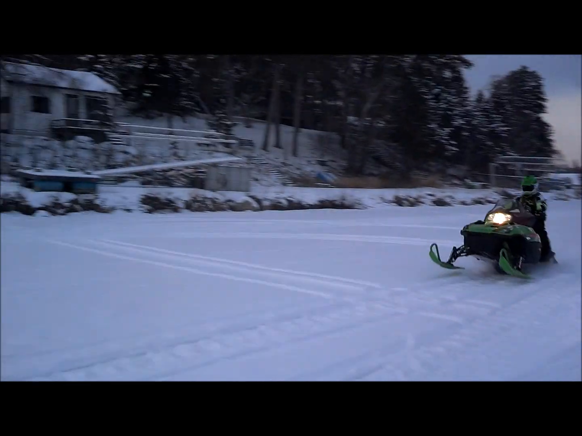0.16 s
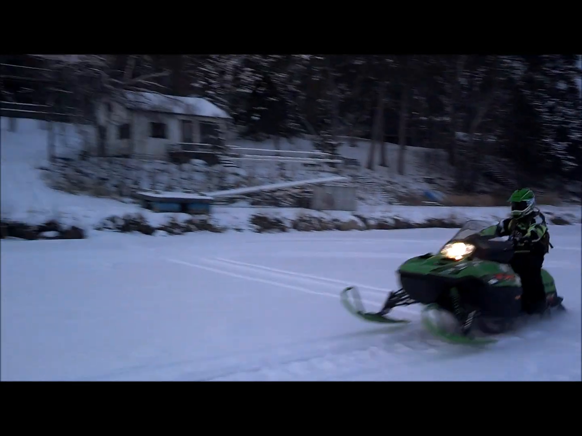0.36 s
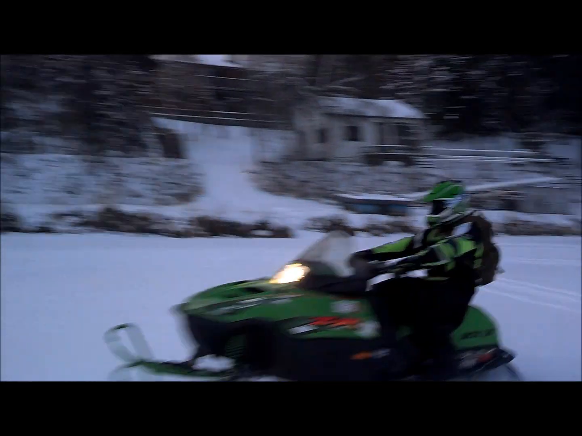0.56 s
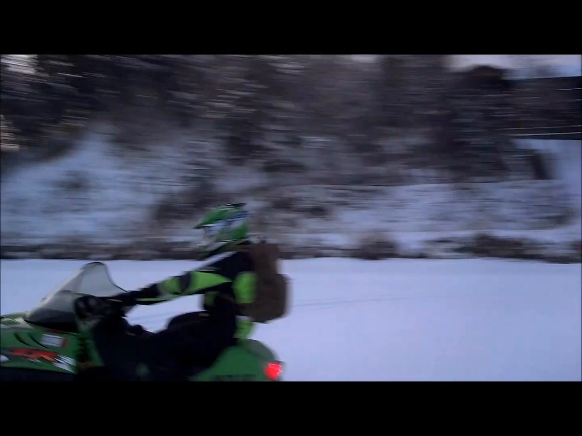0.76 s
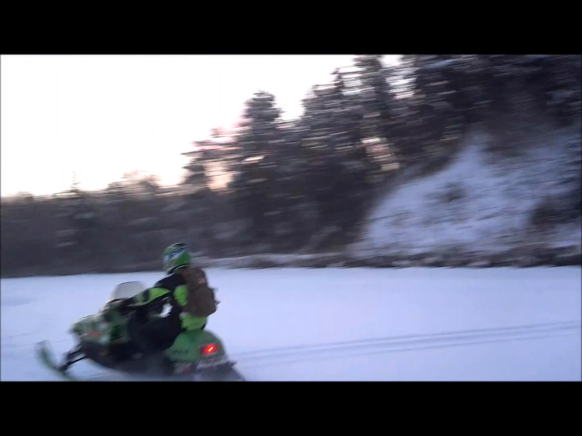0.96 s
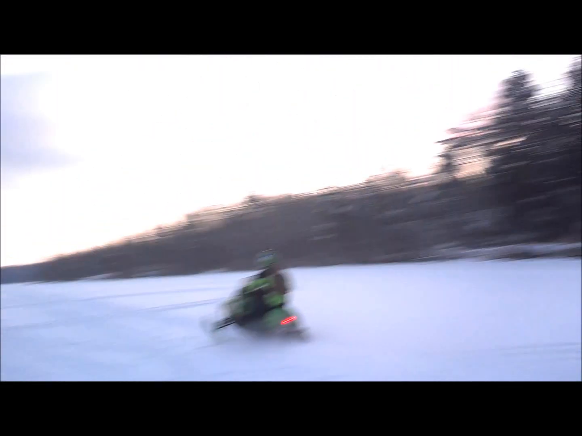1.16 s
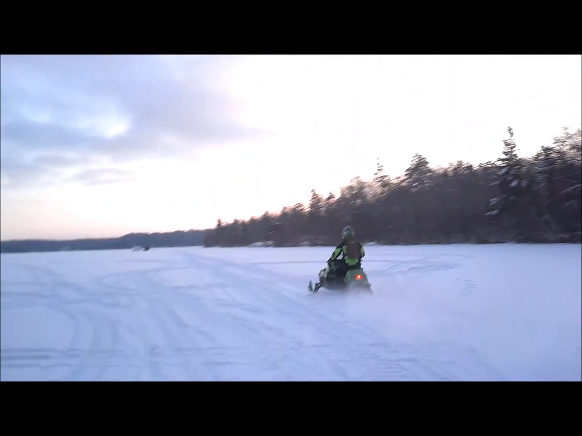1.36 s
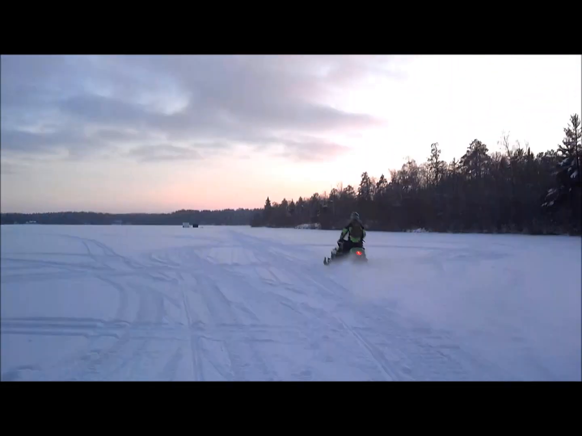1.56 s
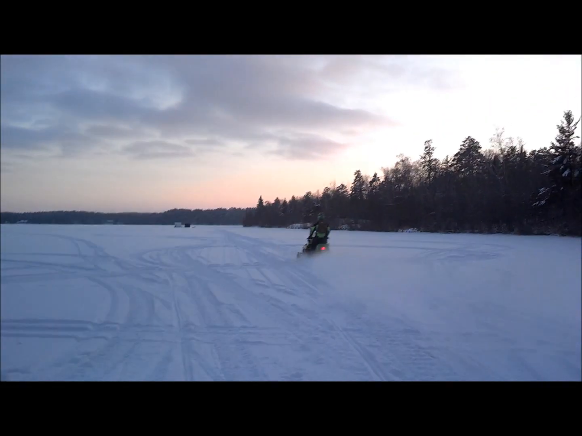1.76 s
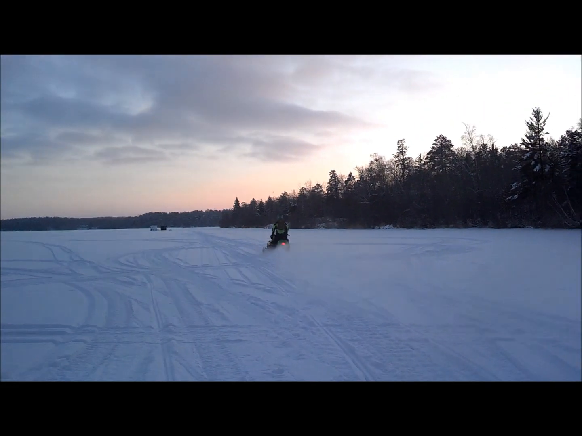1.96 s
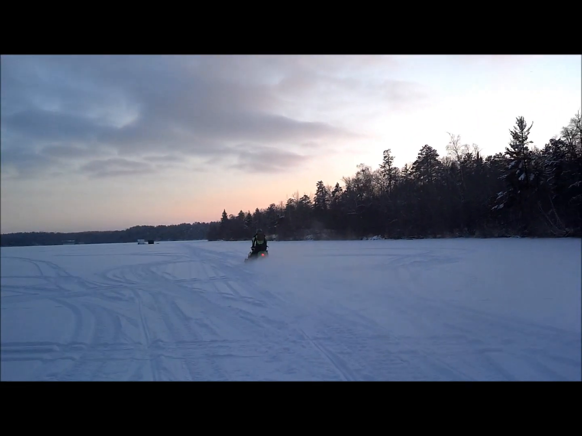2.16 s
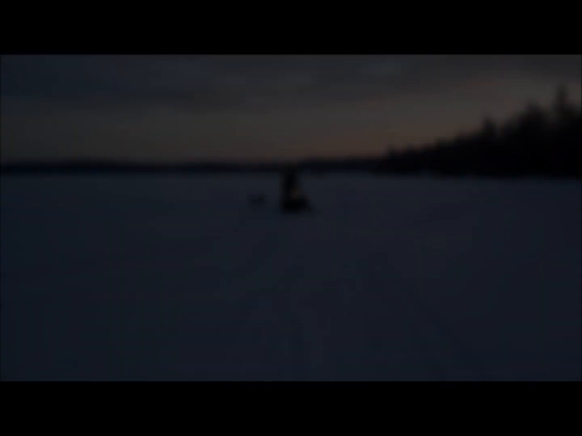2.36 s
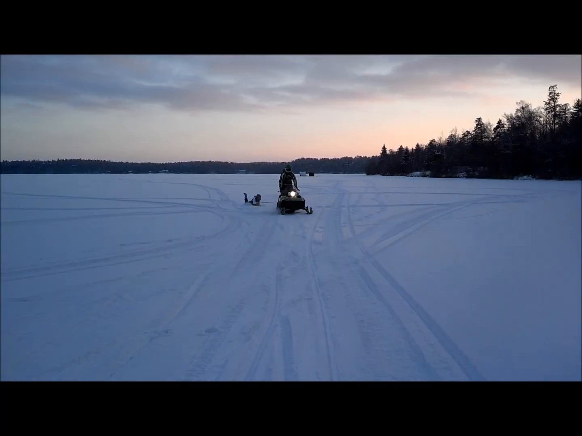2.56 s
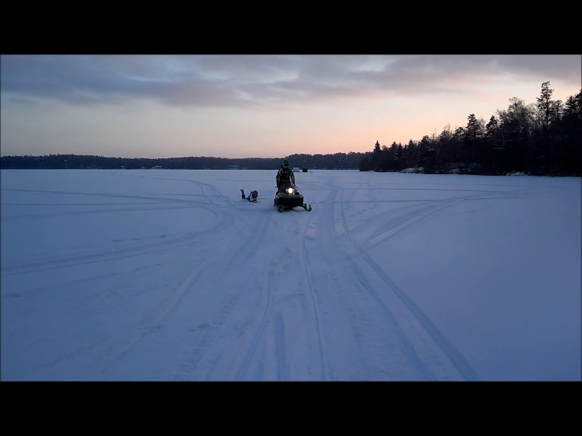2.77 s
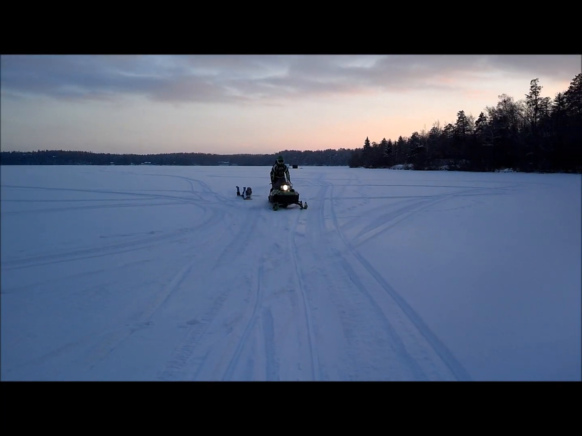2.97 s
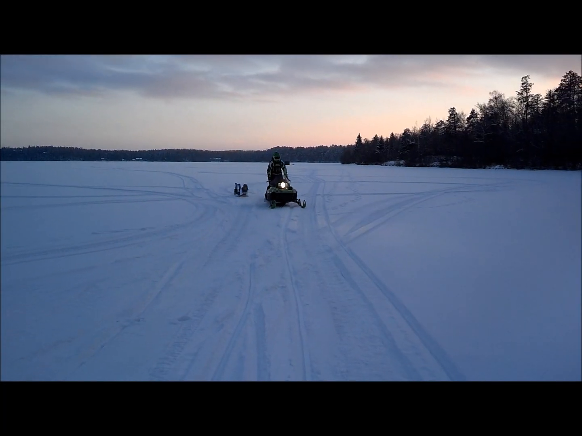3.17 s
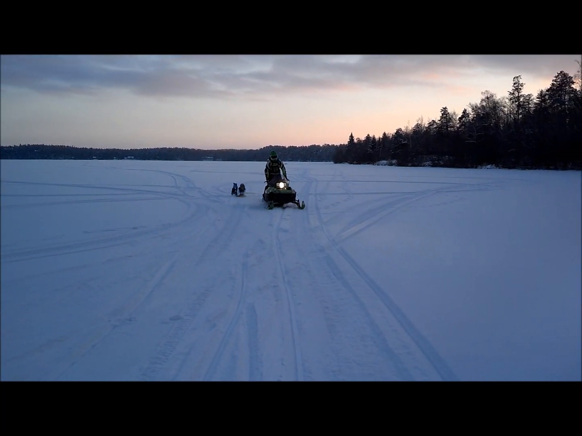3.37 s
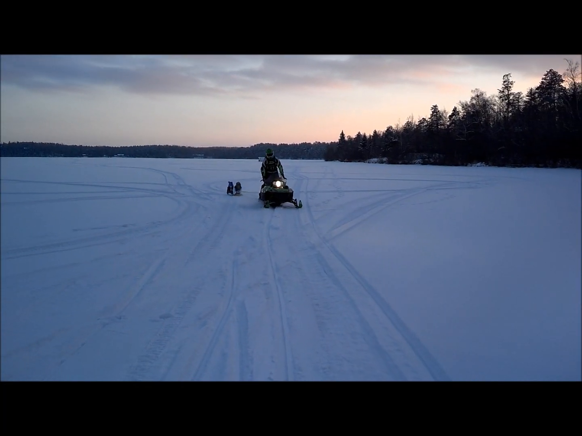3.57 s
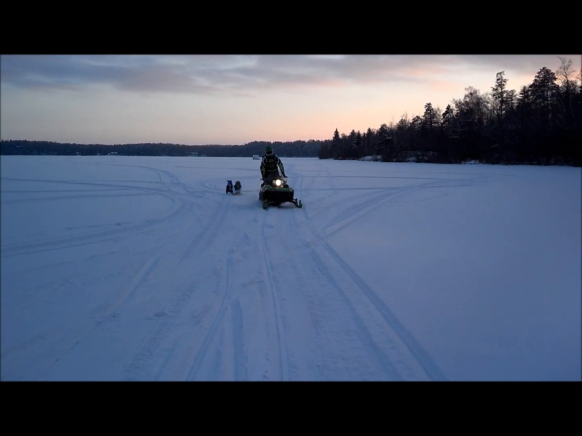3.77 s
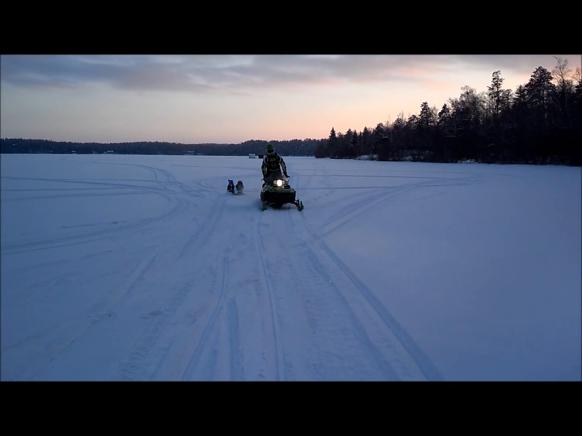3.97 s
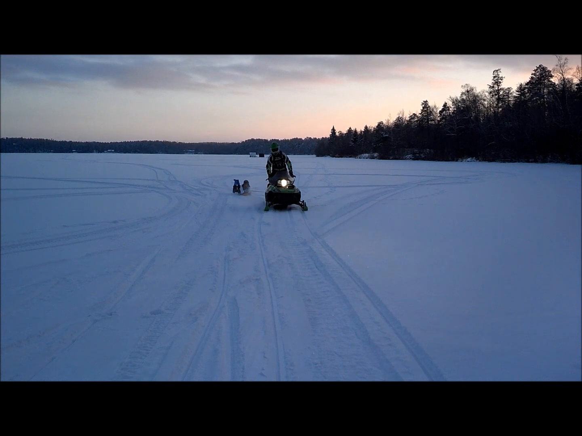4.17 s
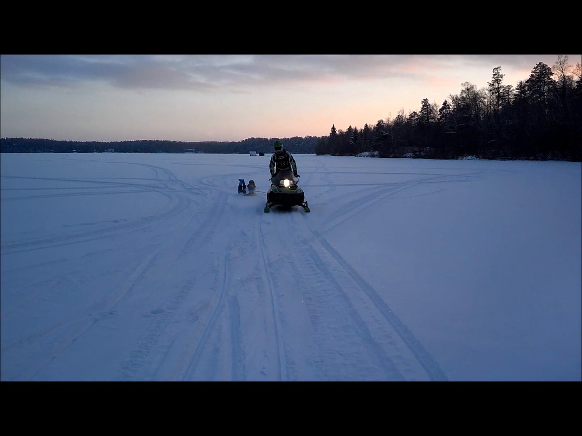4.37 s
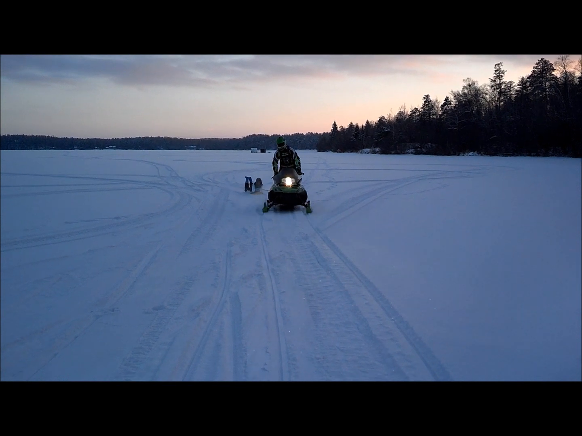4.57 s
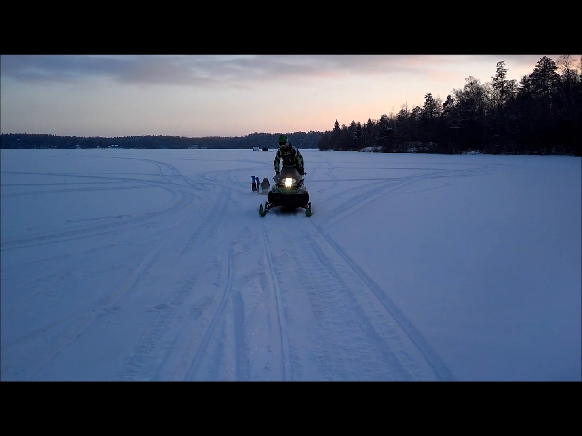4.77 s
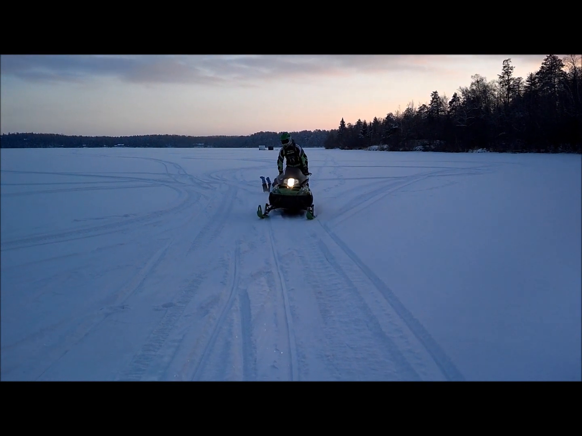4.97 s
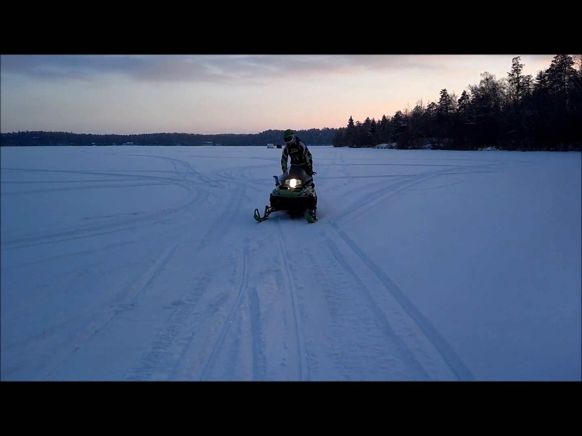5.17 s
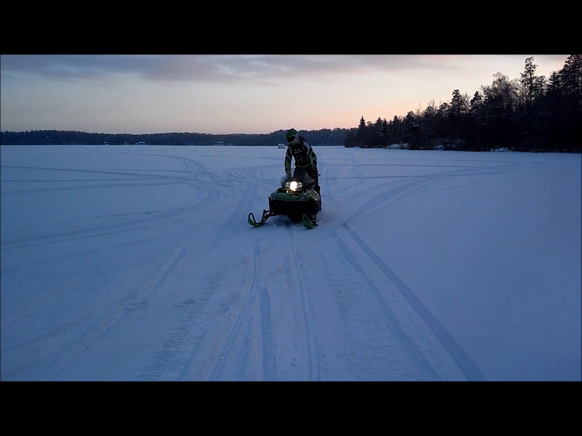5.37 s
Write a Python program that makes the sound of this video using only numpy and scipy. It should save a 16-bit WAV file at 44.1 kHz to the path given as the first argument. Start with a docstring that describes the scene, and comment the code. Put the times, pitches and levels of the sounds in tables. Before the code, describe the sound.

High buzzing two-stroke snowmobile rushes past, drops to a fading track hum, then a hard cut to another engine droning steadily and slowly nearing.

```python
"""Two snowmobiles on a frozen lake

A two-stroke machine races past, shuts its throttle and coasts away on its humming track; after a hard cut a
second one approaches slowly at nearly steady revs. Engines and tracks are additive: sines on the orders of a
rotation. Roar, hiss and rattle are subtractive: coloured noise, partly pulsed at the firing rate.
Two microphone ports, each minus the delayed other, make the stereo."""
import sys
import numpy as np
from scipy import signal
from scipy.fft import rfft, irfft
from scipy.io import wavfile

SR = 44100
rng = np.random.default_rng(int(sys.argv[2]) if len(sys.argv) > 2 else 0)


def output_pcm(signal):
    """Save a mono or channel-first signal as 16-bit PCM at the path in sys.argv[1].

    Samples are clipped to [-1, 1] before scaling.
    """
    pcm = np.clip(np.atleast_2d(signal).T, -1, 1) * 32767
    wavfile.write(sys.argv[1], SR, np.round(pcm).astype(np.int16))


N = 239010
NOW = np.arange(N) / SR   # time, s
CUT_S = 2.297   # the first scene gives way to the second
SPEED_M_PER_S, CLOSEST_S, CLOSEST_M = 23.9, 0.72, 5.02   # straight path past the microphone
SHUT_S = 1.31   # the throttle shuts


# firing-tone spectra radiated towards the microphone, from nose to tail: [f/Hz, level/dB]
NOSE_ON = [(290, 9.5), (580, -6), (870, 0), (1165, 7), (1460, 16), (1750, 17), (2040, 16), (2330, 16.5),
           (2620, 14), (3200, 11), (3500, 9.5), (3800, 6.5), (4100, -11), (4400, -3), (5000, 2.5),
           (7000, 1), (12000, -21)]
FRONT_QUARTER = [(290, 11), (580, -0.5), (870, 10), (1165, 11.5), (1460, 9), (1750, 12), (2040, 24.5),
                 (2330, 10.5), (3200, -18), (3500, 12), (3800, -6), (4100, -6), (4400, -2), (4950, -7),
                 (7000, -7), (12000, -16.5)]
SIDE_ON = [(280, 10.5), (560, -2), (850, 6), (1130, 8.5), (1420, 14.5), (1700, -2.5), (2000, 9.5),
           (2300, -19), (3100, -20), (3400, -13), (3700, 3), (4000, -24), (4300, -17), (4800, -17.5),
           (6500, -9), (12000, -18.5)]
REAR_QUARTER = [(275, 9.5), (550, 10), (825, 5), (1100, 10), (1375, 14), (1650, 12), (1925, 10),
                (2200, 8.5), (3000, 5), (3300, -1), (3550, 3.5), (3850, -19), (4100, 1), (4400, -3),
                (6500, -25), (12000, -27)]
RECEDING = [(267, 22.5), (535, 9.5), (800, 3), (1070, 0), (1335, 12.5), (1600, 9.5), (1870, 7), (2140, -12),
            (3200, 10), (3470, 9.5), (3740, -21), (4000, 3), (4300, 4), (6500, -33), (12000, -27)]
TAIL_ON = [(260, 22.5), (520, 5), (780, 10), (1040, -3), (1300, 13.5), (1550, 16.5), (1850, 8), (2400, 12),
           (3100, -7), (3900, 0), (4500, -7), (12000, -19)]
# when each of these six faces points at the microphone: [t/s]
HEADINGS_S = [.2, .44, 0.621, .82, .96, 1.15]
# half orders from unequal cylinders, heard from behind: [f/Hz, level/dB]
HALF_ORDERS = [(130, 4), (390, -2), (650, 1), (920, 7), (1170, -8), (1430, 0), (1700, -5), (2300, -11)]
HALF_AHEAD_DB, HALF_FROM_S, HALF_RISE_S = -20, 0.62, 0.22   # their weakness until the machine is passing
SNOW_ECHO, ECHO_DETOUR_M2 = 0.27, 1.095   # strength of the bounce; its detour in m is this over the range


def passing_engine(hz, phase, tone_db, gate, range_m):
    """Directivity and comb filtering: orders recoloured by heading and notched by a bounce off the snow."""
    n = round(1.4 * SR)
    out = np.zeros(N)
    now = NOW[:n]
    late_s = ECHO_DETOUR_M2 / range_m[:n] / 343   # speed of sound in m/s
    faces = [NOSE_ON, FRONT_QUARTER, SIDE_ON, REAR_QUARTER, RECEDING, TAIL_ON]
    rates = np.interp(HEADINGS_S, now, hz[:n])
    for k in np.arange(1, 90) / 2:
        is_half = k % 1
        if k > 9 and is_half:
            continue
        if is_half:
            behind = ramp(HALF_FROM_S, HALF_RISE_S)[:n]
            level_db = at_hz(HALF_ORDERS, k * rates[-1]) + HALF_AHEAD_DB * (1 - behind)
        else:
            face_db = [at_hz(face, k * rate) for face, rate in zip(faces, rates)]
            level_db = np.interp(now, HEADINGS_S, face_db)
        # scattered echoes make the upper orders swell, sink and slip in phase
        restless = min(.35 + k / 8, 1)
        gain = from_db(level_db + 1.5 * restless * drift(7)[:n])
        # compact pulses; orders below 2 swing against them
        opposed = np.pi * (k < 2)
        angle = k * phase[:n] - opposed + .2 * restless * drift(3)[:n]
        echo = SNOW_ECHO * np.cos(angle - 2 * np.pi * k * hz[:n] * late_s)
        out[:n] += gain * (np.cos(angle) + echo)
    return from_db(tone_db) * gate * out


# engine with the throttle shut: [multiple of the rotation, level/dB]
OVERRUN_ORDERS = [(1, 2), (3.5, -5), (6, -7), (6.5, -6)]
SHUT_HZ, IDLE_HZ, SINK_S = 258, 100, .38   # revs sink exponentially
OVERRUN_DB, OVERRUN_PEAK_S, OVERRUN_WIDTH_S = -38, 1.445, .075


def engine_overrun(coasting):
    """Exponential run-down: the pitch sinks while the tone swells and dies, higher orders more briefly."""
    hz = IDLE_HZ + (SHUT_HZ - IDLE_HZ) * np.exp(-coasting / SINK_S)
    off_db = ((NOW - OVERRUN_PEAK_S) / OVERRUN_WIDTH_S) ** 2
    dying = [(k, db - k ** 1.5 * off_db) for k, db in OVERRUN_ORDERS]
    tone = orders(turns(hz, jitter=0.0064), dying, waver_db=3, rate=15)
    return from_db(OVERRUN_DB) * ramp(SHUT_S, .03) * tone


# lasting hum of the track lugs on the drive wheels: [multiple of the lug rate, level/dB]
TRACK_ORDERS = [(1, 5), (2, -7.5), (9.4, -17.5)]
# orders that ring out as the load comes off: [multiple of the lug rate, level/dB before rise and fade]
FREED_ORDERS = [(1.5, -7), (4, -13), (8, -5)]
FREED_FADE_DB_PER_S = 38
LUG_HZ, LUG_DOPPLER_HZ_PER_S = 175.4, 7   # rate as the throttle shuts; how fast it falls before that
LUG_STEP_HZ, LUG_SLOWING_HZ_PER_S = 5.9, 16   # drop as the load comes off, and slowing afterwards
TRACK_FROM_S, TRACK_DRIVEN_DB, TRACK_FREE_DB, TRACK_FADE_DB_PER_S = 0.57, -37.5, -33, 6


def track_hum(coasting):
    """Periodic impact: lugs meeting the drive wheels hum at the lug rate, which slows without power."""
    freed = ramp(SHUT_S, 0.1065)
    doppler_hz = LUG_DOPPLER_HZ_PER_S * np.maximum(SHUT_S - NOW, 0)
    hz = LUG_HZ + doppler_hz - LUG_STEP_HZ * freed - LUG_SLOWING_HZ_PER_S * coasting
    level_db = TRACK_DRIVEN_DB + (TRACK_FREE_DB - TRACK_DRIVEN_DB) * freed - TRACK_FADE_DB_PER_S * coasting
    freed_db = 20 * np.log10(freed + 1e-3) - FREED_FADE_DB_PER_S * coasting
    freeing = [(k, db + freed_db) for k, db in FREED_ORDERS]
    hum = orders(turns(hz, jitter=0.003), TRACK_ORDERS + freeing, waver_db=2, rate=15)
    return from_db(level_db) * ramp(TRACK_FROM_S, .03) * hum


# roar under power: [f/Hz, relative density/dB]
PASS_ROAR = [(25, -14), (50, 1), (100, 5), (200, 13), (400, -0.5), (800, -1), (1400, 1.5), (2000, 2),
             (2800, -2), (4000, -25.5)]
# roar while coasting: [f/Hz, relative density/dB]
COAST_ROAR = [(50, -13), (100, 2), (200, 14), (400, -12), (800, -12), (1200, -10), (1400, -5.5), (1520, -3),
              (1620, -10), (1800, -9), (2800, -14), (4000, -37.5)]
# hiss of both machines: [f/Hz, relative density/dB]
HISS = [(1500, -7.5), (2800, 9), (4000, 2), (6000, 0.5), (9000, -6.5), (12000, -14.5), (16000, -14)]
ROAR_DB, COAST_DB, HISS_DB = -25, -21, -28.5   # at the closest distance, the hiss with open throttle
HISS_AHEAD_DB, HISS_SHUT_DB = 5.5, -8.5   # louder ahead of the machine; drop when the throttle shuts
HISS_SPREAD = 0.52   # share of the distance loss


def passing_rush(firing, phase, ahead_m, range_m):
    """Spherical spreading and amplitude modulation: noise fades with range and throbs with each firing."""
    near_db = 20 * np.log10(CLOSEST_M / range_m)
    driven = firing * from_db(ROAR_DB) * coloured(PASS_ROAR, patchy_db=3.1)
    coast = (1 - firing) * from_db(COAST_DB) * coloured(COAST_ROAR, patchy_db=1.5)
    facing_db = HISS_AHEAD_DB * ahead_m / range_m
    hiss_db = HISS_DB + HISS_SPREAD * near_db + facing_db + HISS_SHUT_DB * ramp(SHUT_S, 0.028)
    hiss = from_db(hiss_db) * coloured(HISS, patchy_db=0.8)
    throb = from_db(4.5 * firing * np.cos(phase))
    return throbbing(from_db(near_db) * (driven + coast) + hiss, throb)


# firing rate and tone of the passing engine: [t/s, f/Hz, level/dB before a common 4 dB cut]
PASS = [(0.0, 292.9, -34), (0.09, 291.3, -33.5), (0.23, 292.3, -34), (0.54, 288.9, -26),
        (0.655, 285.7, -25), (0.76, 278.5, -29.5), (0.89, 270.1, -36), (1.02, 264.2, -39.5),
        (1.09, 261.5, -41.5), (1.244, 258.4, -42), (1.295, 254, -46), (1.315, 253, -48)]


def passing_machine():
    """Superposition: engine, overrun, track hum and rush of noise along one straight path."""
    hz, tone_db, firing = in_time(PASS)
    phase = turns(hz, jitter=.0006)
    coasting = np.maximum(NOW - SHUT_S, 0)
    ahead_m = SPEED_M_PER_S * (CLOSEST_S - NOW)
    range_m = np.hypot(ahead_m, CLOSEST_M)
    rush = passing_rush(firing, phase, ahead_m, range_m)
    engine = passing_engine(hz, phase, tone_db - 4, firing, range_m)
    return engine + engine_overrun(coasting) + track_hum(coasting) + rush


# weak firings, where the low tone drops out for a moment: [t/s, dip level/dB]
WEAK_FIRINGS = [(2.374, -14), (2.389, -11), (2.474, -11), (2.492, -7), (2.517, -13), (2.538, -12),
                (2.555, -27), (2.648, -13), (2.712, -15), (2.84, -10), (2.893, -5), (2.96, -8), (3.017, -9),
                (3.076, -5), (3.092, -10), (3.145, -21), (3.2, -7), (3.243, -7), (3.294, -6), (3.384, -10),
                (3.401, -3), (3.46, -3), (3.499, -5), (3.616, -6), (3.634, -6), (3.693, -6), (3.712, -9),
                (3.73, -3), (3.782, -6), (3.87, -16), (3.89, -5), (3.924, -6), (3.961, -10), (4.124, -3.5),
                (4.143, -9), (4.194, -11), (4.211, -3), (4.25, -13), (4.301, -13), (4.318, -4), (4.419, -8),
                (4.473, -16), (4.536, -14), (4.604, -9), (4.62, -6), (4.656, -7), (4.737, -17),
                (4.791, -25), (4.856, -8), (4.906, -9), (4.923, -7), (4.978, -1), (5, -16), (5.018, -8),
                (5.076, -5), (5.128, -3), (5.178, -5), (5.2, -11), (5.246, -4), (5.299, -7), (5.331, -7),
                (5.383, -8), (5.403, -11)]
WEAK_S = 0.006   # half length of a dip


def weak_firings():
    """Irregular combustion: the share of the low tone lost in each Gaussian dip."""
    lost = np.zeros(N)
    for s, db in WEAK_FIRINGS:
        near = slice(round((s - .03) * SR), round((s + .03) * SR))
        lost[near] += (1 - from_db(db)) * np.exp(-((NOW[near] - s) / WEAK_S) ** 2)
    return lost


# towing engine tone, before the common rise: [multiple of the firing rate, level/dB at the cut, slope/(dB/s)]
TOW_ORDERS = [(1, 2.5, 0), (2, -36, 2), (3, -24.5, 1.5), (4, -33.5, -1.04), (5, -39, 0.9), (6, -32, -2),
              (7, -37.5, -1), (8, -53, 2.5), (9, -26.5, -3), (10, -34, 3), (11, -29.5, -3.5), (12, -39, 3),
              (13, -28.5, -5.5), (14, -28, -3.5), (15, -44, 2)]
TOW_TONE_DB = -16
PIPE_CUT_HZ = 118   # the exhaust pipe radiates little below the firing tone


def towing_tone(phase, since, lost):
    """Harmonic synthesis: a nearly pure firing tone broken by weak firings, high-passed by the pipe."""
    table = [(k, db + change * since) for k, db, change in TOW_ORDERS]
    upper = orders(phase, table[1:], waver_db=2.5, rate=3.7)
    lowest = (1 - lost) * orders(phase, table[:1], waver_db=0.65, rate=31)
    pipe = signal.butter(2, PIPE_CUT_HZ, "high", fs=SR, output="sos")
    return signal.sosfiltfilt(pipe, from_db(TOW_TONE_DB) * (upper + lowest))


# rasp with a hump near the cowl resonance: [f/Hz, relative density/dB]
TOW_ROAR = [(50, 2), (100, -9), (150, 3), (205, 12.5), (240, -7), (300, -11.5), (600, -10.5), (1000, -11.5),
            (1300, -6), (1375, -5), (1425, 4.5), (1490, -1.5), (1580, -2), (1670, 1.5), (1750, -4.5),
            (1850, -4), (2300, -8.5), (3000, -40), (4000, -46)]
# bright mechanical rattle: [f/Hz, relative density/dB]
RATTLE = [(2400, -30), (3100, -5), (3500, 0), (4000, -4.5), (4400, -18), (6500, -5), (9000, -26)]
TOW_ROAR_DB, TOW_HISS_DB, RATTLE_DB = -32.5, -43, -65   # at the cut, before throb and flare
RATTLE_RISE_DB_PER_S = 5.5   # on top of the common rise
RASP_AFTER_DB, RASP_LATE_S = 4.5, 0.0092   # the rasp flares just after a weak firing


def towing_noise(phase, since, lost):
    """Amplitude modulation: rasp and rattle throb unevenly with each firing over an unpulsed hiss."""
    flare = from_db(RASP_AFTER_DB * np.roll(lost, round(RASP_LATE_S * SR)))
    beat = from_db((3.5 + 1.5 * drift(40)) * np.cos(phase))
    roar = from_db(TOW_ROAR_DB) * coloured(TOW_ROAR, patchy_db=-0.9)
    rasp = throbbing(roar, flare * beat, rumble_gain=1 - lost)
    hiss = from_db(TOW_HISS_DB) * np.sqrt(flare) * coloured(HISS, patchy_db=1.2)
    rattle_db = RATTLE_DB + RATTLE_RISE_DB_PER_S * since
    return rasp + hiss + from_db(rattle_db) * beat * coloured(RATTLE, patchy_db=0.0)


# exhaust pops: [t/s, level/dB, width of the resonance/Hz]
POPS = [(2.7162, -9, 1700), (4.0432, -15, 350)]
POP_HZ = 1600


def pops():
    """Damped resonance: single soft clicks ringing in the cowl."""
    out = np.zeros(N)
    w = 2 * np.pi * POP_HZ / SR
    for s, db, width_hz in POPS:
        since = np.maximum(np.arange(N) - round(s * SR), 0)   # samples
        decay = np.exp(-np.pi * width_hz * since / SR)
        onset = np.minimum(since / 8, 1)
        out += from_db(db) * decay * np.sin(w * since) * onset
    return out


# low rustle: [f/Hz, relative density/dB]
RUSTLE = [(100, -20), (210, 11), (400, -4), (600, -2), (1200, -35)]
RUSTLE_S, RUSTLE_WIDTH_S, RUSTLE_DB = 1.9, .05, -40.5


def rustle():
    """Gaussian envelope: a brief low noise swell, over before the cut and so unheard in the second scene."""
    swell = np.exp(-((NOW - RUSTLE_S) / RUSTLE_WIDTH_S) ** 2)
    return from_db(RUSTLE_DB) * swell * coloured(RUSTLE, patchy_db=-10.0)


# firing rate of the towing engine: [t/s, f/Hz]
TOW = [(2.32, 152.2), (2.75, 153.2), (2.99, 154.8), (3.2, 155.4), (3.93, 155.8), (4.08, 154.4),
       (4.21, 152.7), (4.94, 152.1), (5.0, 153), (5.4, 152.8)]
NEARING_DB_PER_S = .5   # engine tone and noise swell as the machine nears


def towing_machine():
    """Superposition: tone and noise share one firing phase and rise together; pops and rustle are added."""
    hz, _ = in_time(TOW)
    since = NOW - CUT_S
    phase = turns(hz, jitter=.0007)
    phase -= phase[round(CUT_S * SR)] + 1.94   # fixes the phase at the cut
    lost = weak_firings()
    tone = towing_tone(phase, since, lost)
    noise = towing_noise(phase, since, lost)
    return from_db(NEARING_DB_PER_S * since) * (tone + noise) + rustle() + pops()


FAR_PORT_HZ = 1216   # the shadow dulls the far port above this
SCATTER_DB, SCATTER_HZ, SCATTER_S = -8, 1300, .014   # level, lower edge, decay time constant
PORT_LAG = 16   # samples


def microphone(near, far_db, vent_hz):
    """Pressure gradient: each channel is its port minus the delayed other; the far port is shadowed."""
    shadowed = signal.lfilter(*signal.butter(2, FAR_PORT_HZ, fs=SR), near)
    shadowed = signal.lfilter(*signal.butter(1, vent_hz, "high", fs=SR), shadowed)
    # treble reaches the far port mostly by many scattered, later paths
    paths = rng.standard_normal(6000) * np.exp(-np.arange(6000) / (SCATTER_S * SR))
    treble = signal.lfilter(*signal.butter(2, SCATTER_HZ, "high", fs=SR), near)
    scattered = signal.fftconvolve(treble, paths / np.linalg.norm(paths))[:N]
    far = from_db(far_db) * shadowed + from_db(SCATTER_DB) * scattered
    ports = np.array([near, far])
    delayed = np.pad(ports, ((0, 0), (PORT_LAG, 0)))[:, :N]
    return ports - delayed[::-1]


def throbbing(noise, gain, rumble_gain=1):
    """Band-split modulation: noise above 900 Hz is pulsed; the rumble below has its own gain."""
    upper = signal.sosfiltfilt(signal.butter(2, 900, "high", fs=SR, output="sos"), noise)
    return rumble_gain * (noise - upper) + gain * upper


def orders(phase, table, waver_db, rate):
    """Fourier series: sines on multiples of a rotation, the lowest wavering most; each rms 1 at 0 dB."""
    total = 0
    for k, db in table:
        level_db = db + waver_db * drift(rate) / np.sqrt(min(k, 3))
        total = total + np.sqrt(2) * from_db(level_db) * np.sin(k * phase + k * k)
    return total


def turns(hz, jitter):
    """Phase as the integral of frequency: radians of a slightly unsteady rotation."""
    return 2 * np.pi * np.cumsum(hz * (1 + jitter * drift(47.0))) / SR


def coloured(spectrum, patchy_db):
    """Filtered noise: a given colour whose octaves flicker partly on their own; rms 1."""
    hz = np.maximum(np.fft.rfftfreq(N, 1 / SR), 10)
    shaped = rfft(rng.standard_normal(N)) * from_db(at_hz(spectrum, hz))
    out, together = 0, drift(2.7)
    for centre in 40 * 2. ** np.arange(10):
        octave = np.clip(1 - abs(np.log2(hz / centre)), 0, 1)
        flicker = from_db(patchy_db * (.5 * together + drift(17.0)))
        out = out + irfft(shaped * octave, N) * flicker
    return rms_one(out)


def drift(rate):
    """Low-passed random process: noise at every 40th sample through a double one-pole; rms 1."""
    r = np.exp(-80 * np.pi * rate / SR)
    slow = signal.lfilter([1], [1, -2 * r, r * r], rng.standard_normal(N // 40 + 2002))
    slow = slow[2000:]   # drop the filter's settling
    return np.interp(np.arange(N) / 40, np.arange(len(slow)), rms_one(slow))


def in_time(rows):
    """Linear interpolation: columns as signals, and a gate open while the table lasts."""
    s, *columns = np.transpose(rows)
    gate = np.clip(np.minimum(NOW - s[0], s[-1] - NOW) / 0.015 + 1, 0, 1)
    return [np.interp(NOW, s, c) for c in columns] + [gate]


def at_hz(points, hz):
    """Spectral envelope: level in dB, interpolated over log frequency."""
    table_hz, table_db = np.array(points).T
    return np.interp(np.log(hz), np.log(table_hz), table_db)


def ramp(since_s, length_s):
    """Linear onset: rises from 0 to 1, starting at a given time."""
    return np.clip((NOW - since_s) / length_s, 0, 1)


def from_db(db):
    """Decibel definition: amplitude ratio of a level."""
    return 10 ** (np.asarray(db) / 20)


def rms_one(x):
    """Normalisation: scales to unit root mean square."""
    return x / np.sqrt(np.mean(x ** 2) + 1e-20)


FAR_PORT_DB, FAR_PORT_ABEAM_DB = -3.5, 2.5   # the far port leaves the shadow while the machine is abeam
PASS_VENT_HZ, TOW_VENT_HZ = 59, 29.2   # close by, the far port gets less of the deep bass


def scene():
    """Juxtaposition: two scenes, each through the microphone, joined by a hard cut."""
    abeam = 1 / (1 + (SPEED_M_PER_S * (NOW - CLOSEST_S) / CLOSEST_M) ** 2)
    passing = microphone(passing_machine(), FAR_PORT_DB + FAR_PORT_ABEAM_DB * abeam, PASS_VENT_HZ)
    towing = microphone(towing_machine(), FAR_PORT_DB, TOW_VENT_HZ)
    return np.where(np.arange(N) < CUT_S * SR, passing, towing)


def record(dry):
    """Saturation and band limiting: peaks are rounded, then the top is cut, by 70 dB from 15950 Hz up."""
    low_pass = signal.cheby2(24, 70, 15950, fs=SR, output="sos")
    return signal.sosfilt(low_pass, np.tanh(dry))


dry = scene()
out = record(dry)
output_pcm(out)
```